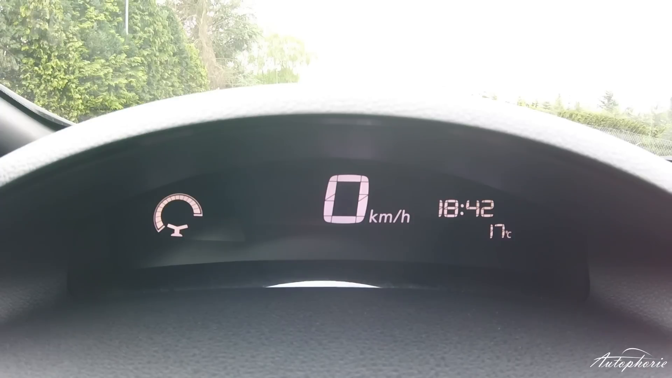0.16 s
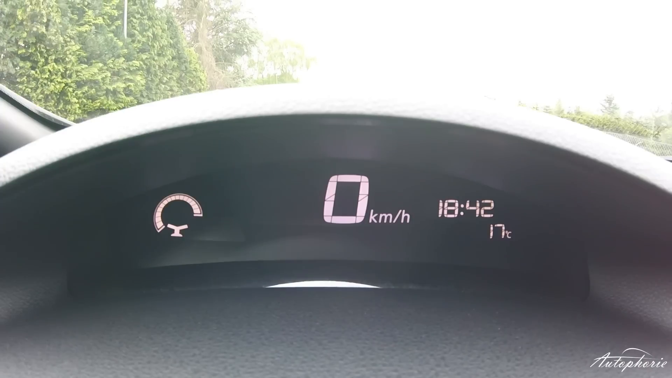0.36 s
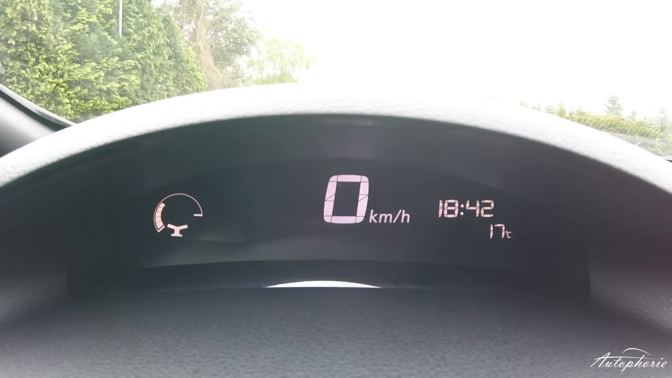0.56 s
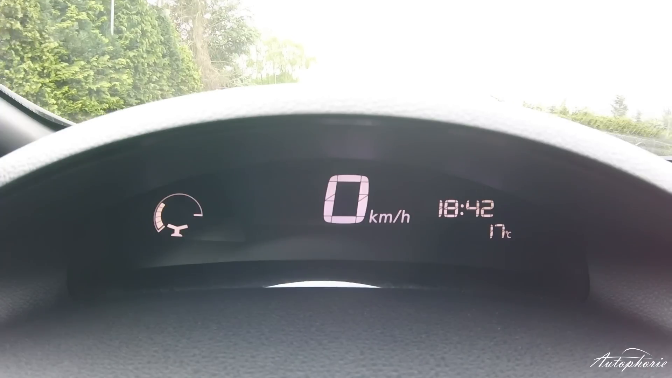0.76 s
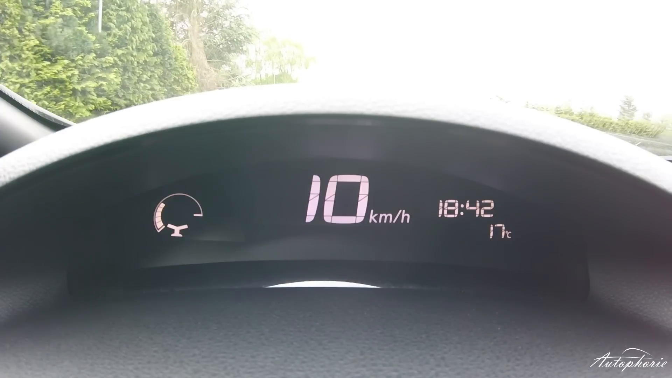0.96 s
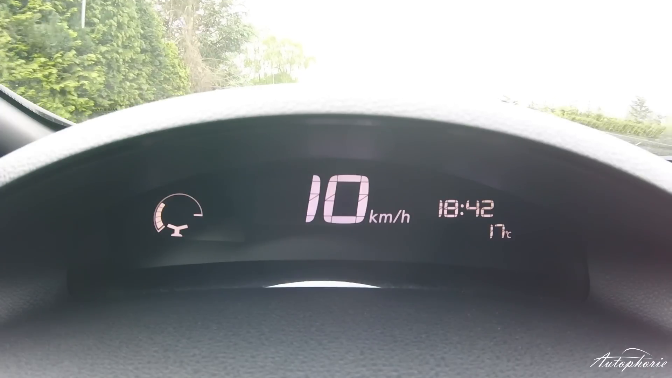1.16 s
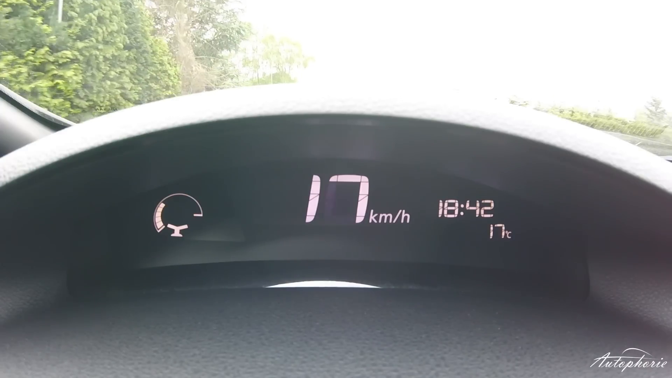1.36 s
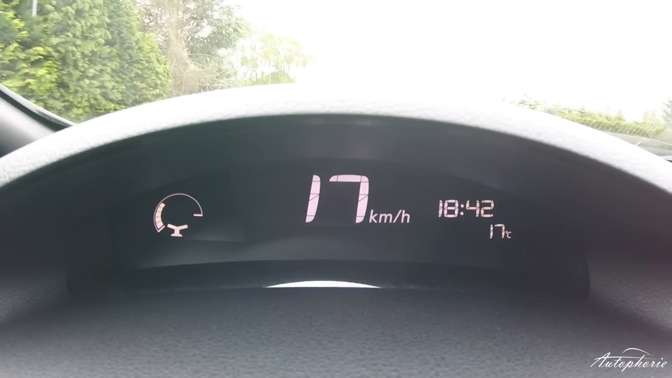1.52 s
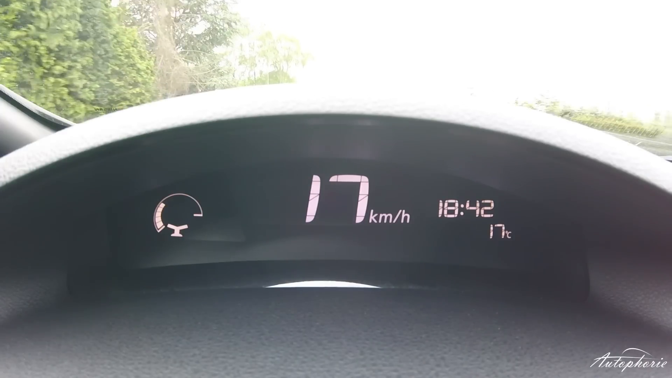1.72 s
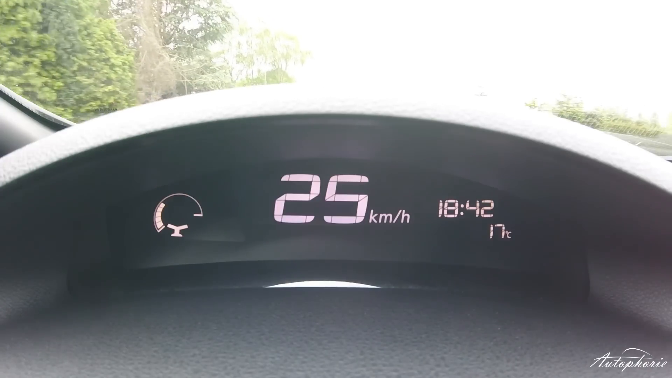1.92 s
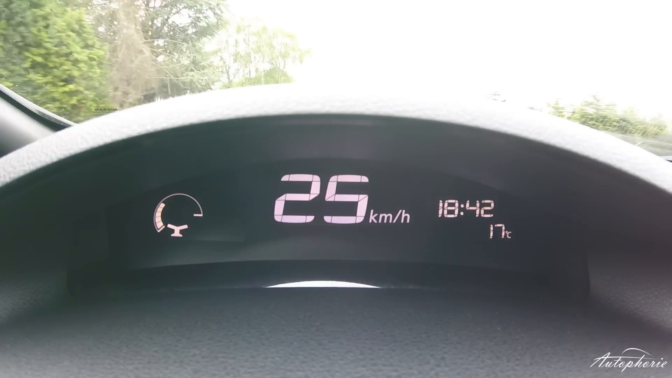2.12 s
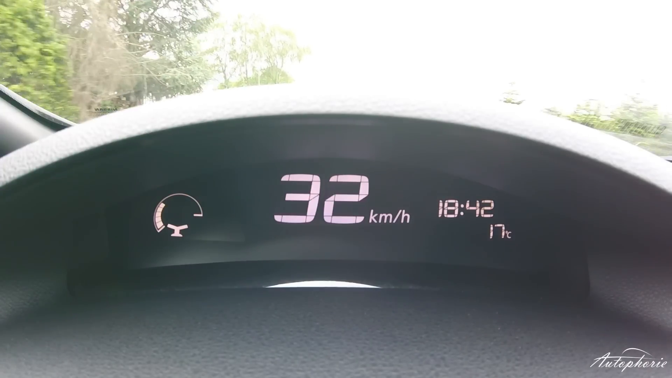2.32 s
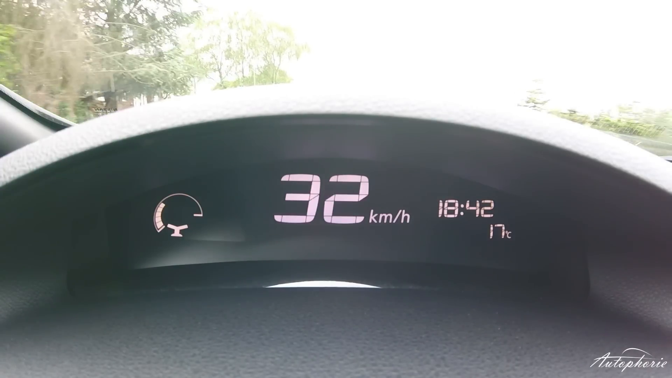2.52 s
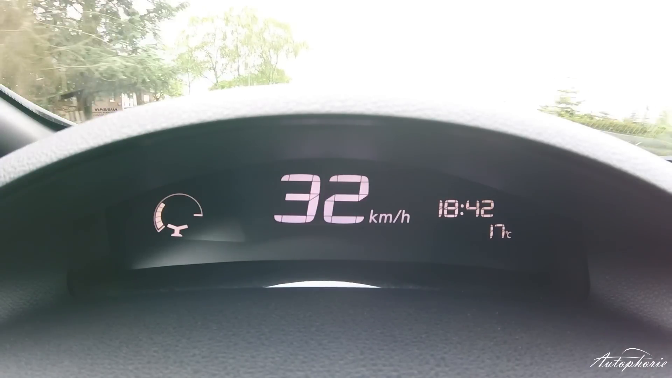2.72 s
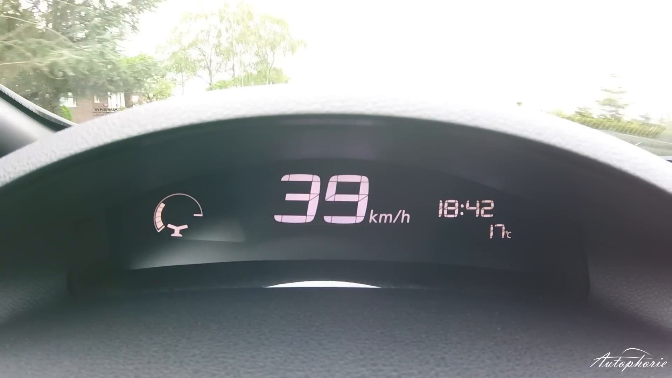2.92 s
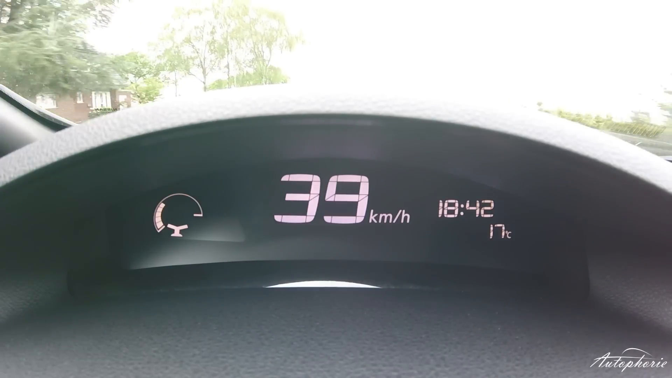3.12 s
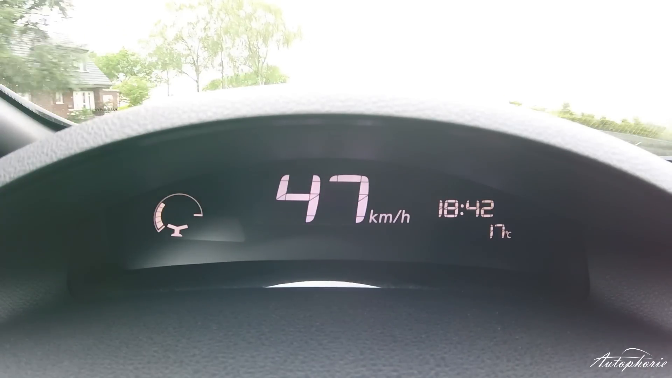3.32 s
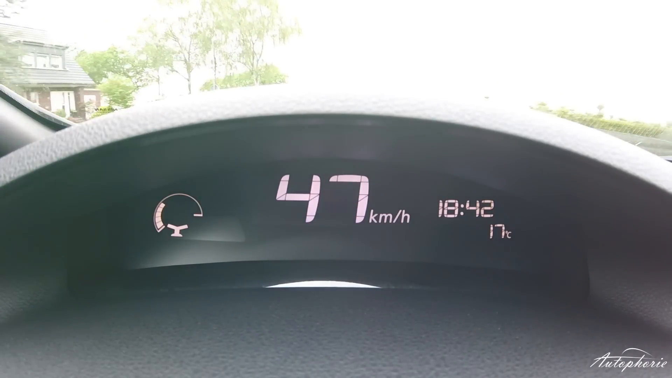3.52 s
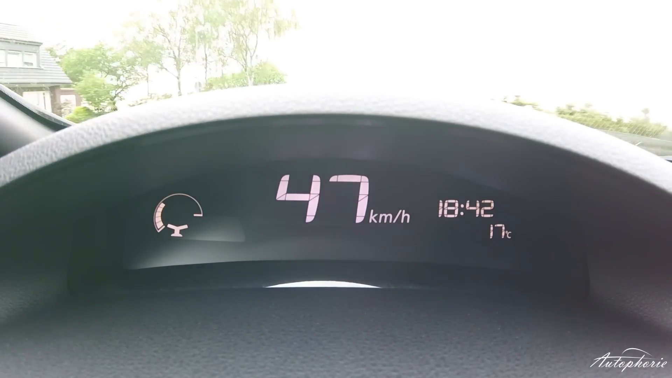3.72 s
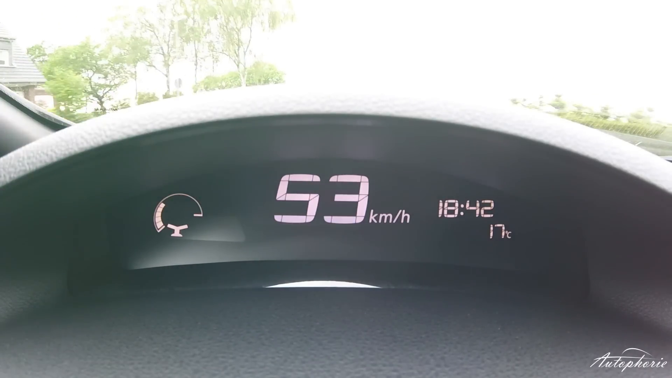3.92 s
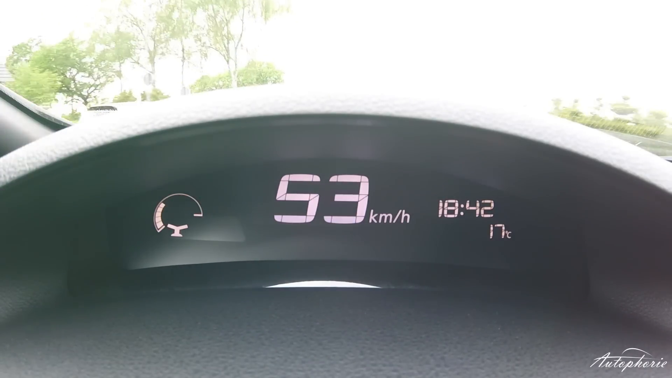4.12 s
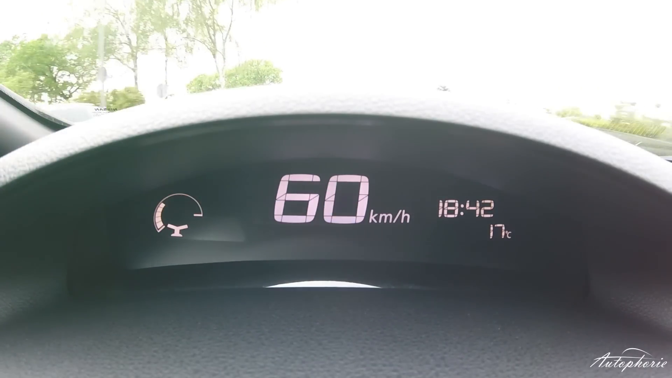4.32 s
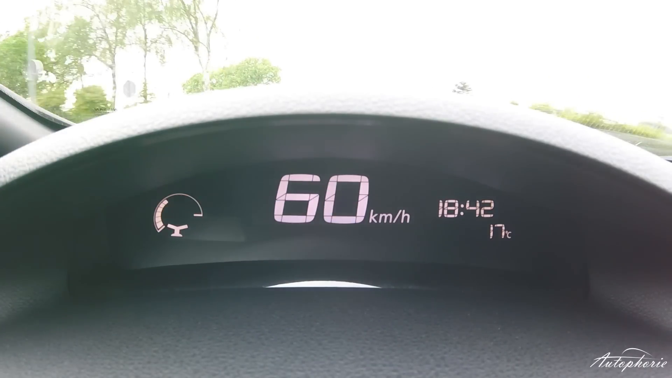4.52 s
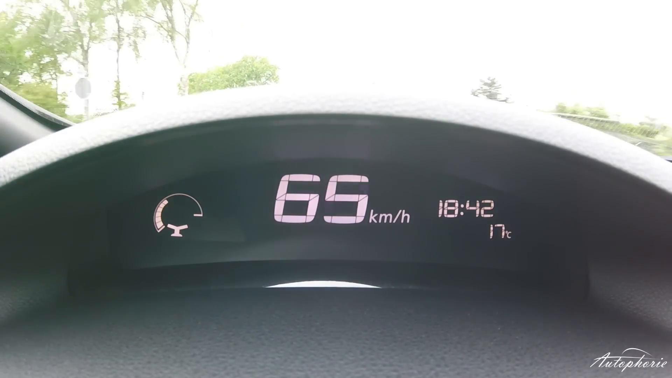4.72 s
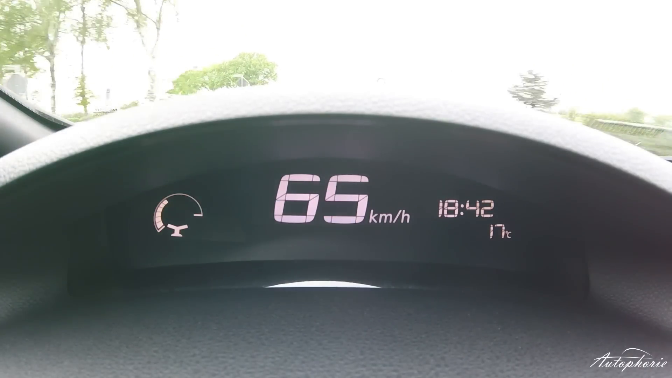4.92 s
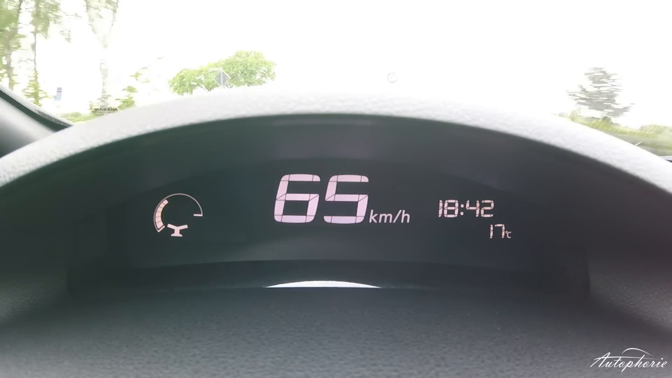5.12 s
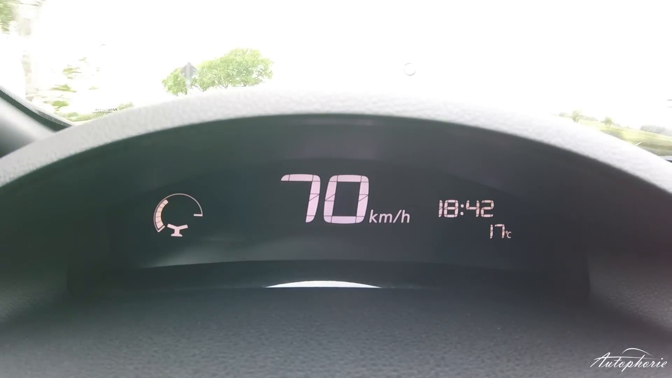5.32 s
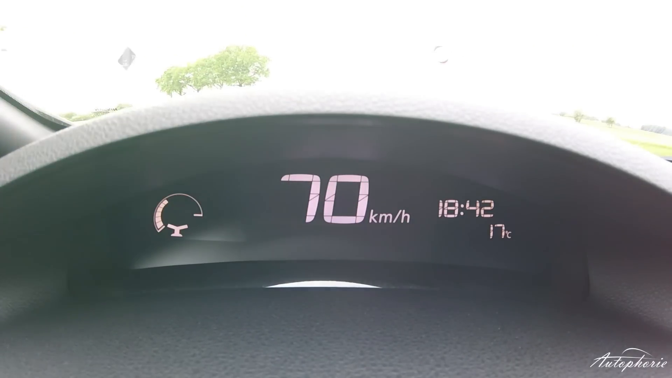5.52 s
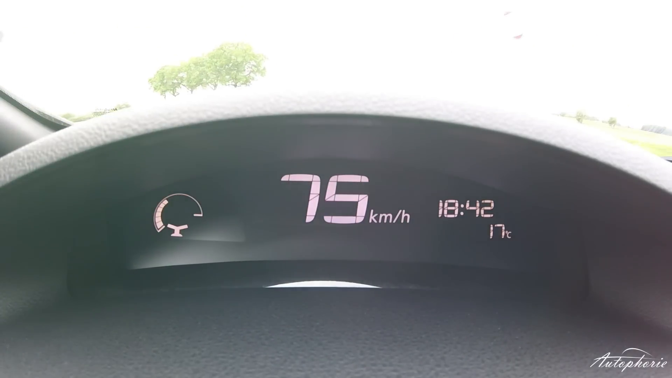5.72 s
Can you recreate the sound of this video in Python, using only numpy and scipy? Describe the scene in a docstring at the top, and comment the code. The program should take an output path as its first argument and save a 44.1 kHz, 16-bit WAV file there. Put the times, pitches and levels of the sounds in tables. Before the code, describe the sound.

Inside an electric car flooring it from standstill: a click and thump, then a rising motor whine over swelling road rumble and wind roar.

```python
"""Inside an electric car, microphone in the cabin, as it pulls away from rest at full power.
Motor and gear tones are multiples of the climbing shaft speed and swell as they cross the cabin's modes.
Shaped noise gives rumble, tread and wind roar that grow with speed; narrow noise gives the low boom.
Sharp clicks, a double thump, decaying trim resonances that creak and a few squeaks lie over a steady
hiss and a faint inverter whistle."""
import sys
import numpy as np
from scipy import signal
from scipy.fft import rfft, irfft
from scipy.io import wavfile
from scipy.ndimage import uniform_filter1d

SR = 44100
rng = np.random.default_rng(int(sys.argv[2]) if len(sys.argv) > 2 else 0)


def invert_db(level):
    """Linear amplitude ratio for a level in decibels (20 dB per decade), elementwise."""
    return 10 ** (np.asarray(level, dtype=float) / 20)


def file_out(sig):
    """Save sig as 16-bit WAV at sys.argv[1]."""
    # one column per channel
    cols = np.atleast_2d(sig).T
    # limit, then scale
    lim = np.clip(cols, -1, 1)
    pcm = np.round(lim * 32767).astype(np.int16)
    wavfile.write(sys.argv[1], SR, pcm)


N = 254016
T = np.arange(N) / SR
BASE_HZ = 96  # shaft speed at which full torque gives way to full power

# time and frequency grid of the noise spectra: frames of 2048 samples, 512 apart
FRAME_T = np.arange(N // 512 + 5) * 512 / SR
BIN_HZ = np.fft.rfftfreq(2048, 1 / SR)[:, None]

# level of the tyre tread band where it stands on its climb [f/Hz, level/dB]
TREAD_LEVEL = [(40, -70), (65, -37.5), (90, -32.5), (147, -31), (180, -35), (260, -31), (330, -43),
               (460, -39), (580, -42), (740, -61)]


def evened(x):
    """Scales a sound to rms 1."""
    return x / np.sqrt(np.mean(x ** 2) + 1e-20)


def read(points, hz):
    """Reads a (Hz, value) curve, straight between its points on a log frequency axis."""
    f, value = np.transpose(points)
    return np.interp(np.log(hz + 1), np.log(f + 1), value)


def add(mix, s, sound):
    """Lays a sound into the mix from s seconds on."""
    part = mix[round(s * SR):][:len(sound)]
    part += sound[:len(part)]


def smooth(x, width_hz):
    """One-pole low pass with its corner at half of width_hz."""
    r = np.exp(-np.pi * width_hz / SR)
    return signal.lfilter([1 - r], [1, -r], x)


def resonate(x, hz, width_hz):
    """A damped mode: shifts hz down to zero, smooths there and shifts back."""
    turn = np.exp(2j * np.pi * hz * np.arange(len(x)) / SR)
    return 2 * (turn * smooth(x / turn, width_hz)).real


def tone(hz, db, width_hz, steady):
    """A line on the curve hz, blurred by a wandering phase; steady 0 throbs like noise, 1 is the most even."""
    drift = evened(smooth(smooth(rng.standard_normal((2, N)), width_hz), width_hz))
    even = (np.sum(drift ** 2, axis=0) + 0.46) ** (-np.clip(steady, 0, 1) / 2)
    turn = 2 * np.pi * np.cumsum(hz) / SR
    wave = even * (drift[0] * np.cos(turn) + drift[1] * np.sin(turn))
    return invert_db(db) * evened(wave)


def whine(hz, wander_rad):
    """A steady sine on the curve hz, rms 1, whose phase wanders a little."""
    wander = evened(smooth(smooth(rng.standard_normal(N), 30), 30))
    return np.sqrt(2) * np.cos(2 * np.pi * np.cumsum(hz) / SR + wander_rad * wander)


def noise(spectrum):
    """Noise built from random complex spectra, frame by frame, under the given amplitudes."""
    real, imaginary = rng.standard_normal((2, len(BIN_HZ), len(FRAME_T)))
    unit = np.sqrt(3 / 8)  # overlap of four Hann frames: rms 1 for unit power
    z = (real + 1j * imaginary) * spectrum * unit
    return signal.istft(z, nperseg=2048, noverlap=1536)[1][:N]


def shaft(t):
    """Shaft speed in Hz: torque builds, holds up to base speed, then power holds and the climb flattens."""
    start_s, torque_rise_s, climb_hz_per_s = 0.035, 0.17, 32.35
    u = np.maximum(t - start_s, 0)
    hz = climb_hz_per_s * (u - torque_rise_s * (1 - np.exp(-u / torque_rise_s)))
    # the climb hesitates briefly as the drive shafts take up slack
    catch_s, catch_length_s, catch_hz = 0.405, 0.03, 0.7
    hz = np.maximum(hz - catch_hz * np.exp(-((t - catch_s) / catch_length_s) ** 2), 0)
    at_full_power = np.sqrt(abs(BASE_HZ * (2 * hz - BASE_HZ)))
    return np.where(hz > BASE_HZ, at_full_power, hz)


def with_speed(shaft_hz, db, db_per_octave, rest_hz):
    """Level law of a road sound: db near base speed, levelling off below rest_hz of shaft speed."""
    return db + db_per_octave * np.log2(np.hypot(shaft_hz, rest_hz) / BASE_HZ)


def lift(hz):
    """Gain that the resonant panels give to road noise."""
    # panels that colour the road noise [f/Hz, width/Hz, lift/dB]
    panel_modes = [(141.6, 4.9, 6.5), (225.7, 8.2, 10), (242.6, 4.3, 10), (261, 18, 9), (463, 20, 3.5),
                   (500, 21, 2), (551, 49, 4.5), (823, 8.5, 8), (932, 33, 3.5), (1640, 9.5, 4.5),
                   (2240, 14, 11), (4350, 120, 5.5)]
    return invert_db(sum(db / (1 + (2 * (hz - f) / w) ** 2) for f, w, db in panel_modes))


def road():
    """Shaped noise through the panels: rumble, a tread band that climbs with shaft speed, and roar."""
    # shape of the rumble, relative [f/Hz, level/dB per Hz]
    rumble_curve = [(56, -25.5), (95, -20), (108, -0.5), (172, -6), (194, -16), (236, -12), (296, -27),
                    (330, -25), (430, -45.5), (730, -120)]
    # shape of the tyre and wind roar before its tilt, relative [f/Hz, level/dB per Hz]
    roar_curve = [(160, -20), (280, -3), (392, -7.5), (752, -11.5), (797, -11.5), (864, -16), (948, -12),
                  (1460, -25.5), (1620, -22.5), (2550, -31.5), (4500, -36.5), (5850, -67), (9900, -120)]
    shaft_hz = shaft(FRAME_T)

    # the rumble climbs from its rest level around the knee speed, then holds
    rumble_db, rest_db, knee_hz = -28, -49, 27.5
    rumble_db = rumble_db + (rest_db - rumble_db) * np.exp(-(shaft_hz / knee_hz) ** 2)
    rumble = invert_db(read(rumble_curve, BIN_HZ))

    tread_order, tread_octaves = 4.705, 0.24  # centre in multiples of shaft speed, width
    tread_hz = tread_order * shaft_hz
    tread_db = read(TREAD_LEVEL, tread_hz)
    octaves = np.log2((BIN_HZ + 1) / (tread_hz + 1))
    tread = np.exp(-0.5 * (octaves / tread_octaves) ** 2) + 1e-9

    # a roar of movement in the cabin dies away at the start
    settle_db, settle_s = -47, 0.1
    settling = invert_db(settle_db) ** 2 * np.exp(-FRAME_T / settle_s)
    driving = invert_db(with_speed(shaft_hz, db=-39.5, db_per_octave=6.3, rest_hz=3.2)) ** 2
    roar_db = 10 * np.log10(driving + settling)
    # the roar brightens with speed
    tilt_db = -3 * (1.5 - shaft_hz / shaft_hz[-1])
    roar = invert_db(tilt_db * np.log2(BIN_HZ / 1000 + 0.098)) * invert_db(read(roar_curve, BIN_HZ))

    # small uneven patches in time and frequency, shared by all three layers
    patches = rng.standard_normal((len(BIN_HZ), len(FRAME_T)))
    patches = uniform_filter1d(patches, size=8, axis=0)
    patches = evened(uniform_filter1d(patches, size=5, axis=1))
    power = 0
    for shape, db in ((rumble, rumble_db), (tread, tread_db), (roar, roar_db)):
        # each level holds as heard after the panels
        after_panels = np.sum((lift(BIN_HZ) * shape) ** 2, axis=0)
        power = power + shape ** 2 / after_panels * invert_db(db + 0.59 * patches) ** 2
    tyres = noise(np.sqrt(power))
    return irfft(rfft(tyres) * lift(np.fft.rfftfreq(N, 1 / SR)), N)


def hiss():
    """Steady shaped noise with a sharp upper edge and a slight flicker in broad bands."""
    # shape of the hiss, relative [f/Hz, level/dB per Hz]
    hiss_curve = [(180, -31), (300, 0.5), (354, -6), (535, 0), (696, -10), (1460, -14), (1590, -12),
                  (3810, -20.5), (6790, -18.5), (12700, -32.5), (15500, -50)]
    hiss_db, top_hz, flicker_db = -56, 14500, 1.0
    shape = invert_db(read(hiss_curve, BIN_HZ)) / (1 + (BIN_HZ / top_hz) ** 200)
    flicker = rng.standard_normal((len(BIN_HZ), len(FRAME_T)))
    flicker = evened(uniform_filter1d(flicker, size=200, axis=0))
    return noise(shape / np.linalg.norm(shape) * invert_db(hiss_db + flicker_db * flicker))


def swells(bumps):
    """Level in dB of a mode that each bump swings up and lets die."""
    power = sum(invert_db(db) ** 2 * np.exp(-np.abs(2 * (T - s) / length) ** 1.76) for s, db, length in bumps)
    return 10 * np.log10(power + 1e-12)


def boom():
    """The road keeps the body heave and the cabin air mode swinging; larger bumps make them swell."""
    # larger bumps that swing the body heave [t/s, level/dB, length/s]
    heave_bumps = [(.23, -26.5, 0.086), (.81, -40, 0.036), (1.0, -33, 0.044), (1.63, -23, 0.14),
                   (2.27, -24, 0.12), (3.06, -38, 0.066), (3.34, -19.5, 0.13), (3.66, -24, 0.069),
                   (3.99, -22, 0.14), (4.21, -27, 0.082), (4.7, -18.5, 0.2), (5.13, -28.5, 0.055),
                   (5.65, -32, 0.11)]
    # larger bumps that swing the cabin air [t/s, level/dB, length/s]
    air_bumps = [(.7, -23, 0.26), (1.22, -27.5, 0.2), (1.92, -27.5, 0.16), (2.18, -22.5, 0.066),
                 (2.48, -20, 0.12), (2.72, -20.5, 0.32), (3.12, -18, 0.053), (3.4, -18, 0.045),
                 (3.59, -15, 0.11), (3.93, -25, 0.2), (4.36, -14.5, 0.13), (4.82, -19.5, 0.11),
                 (5.06, -18.5, 0.072), (5.32, -18.5, 0.11), (5.55, -24, 0.19)]
    shaft_hz, one = shaft(T), np.ones(N)
    heave_db = with_speed(shaft_hz, db=-28, db_per_octave=1.9, rest_hz=2.3)
    air_db = with_speed(shaft_hz, db=-25, db_per_octave=4.54, rest_hz=15)
    out = tone(31.6 * one, heave_db, width_hz=29.0, steady=0.25)
    out += tone(68.56 * one, air_db, width_hz=34.9, steady=0.52)
    out += tone(34.98 * one, swells(heave_bumps), width_hz=7.9, steady=1.0)
    out += tone(62.45 * one, swells(air_bumps), width_hz=5.4, steady=0.73)
    return out


def inverter_whistle():
    """The inverter's switching: a faint high whistle of constant pitch and level."""
    # steady whistle [f/Hz, level/dB]
    whistles = [(10002, -98)]
    return sum(invert_db(db) * whine(hz * np.ones(N), wander_rad=0.5) for hz, db in whistles)


def clicks():
    """Sharp clicks: the signal jumps suddenly and leaks back to zero."""
    # sudden jumps [t/s, step before smoothing/dB, direction, upper corner/Hz]
    jumps = [(0.0294, -27, -1, 29400), (4.73, -30, 1, 8700)]
    out = np.zeros(N)
    for s, db, sign, sharp_hz in jumps:
        step = np.exp(-np.arange(2000) / SR / 0.0043)  # leak time in s
        rounded = smooth(smooth(step, 2 * sharp_hz), 2 * sharp_hz)
        add(out, s, np.sign(sign) * invert_db(db) * rounded)
    return out


def drive_line():
    """Orders of the shaft speed, and the inverter side tone that sinks as the shaft speeds up."""
    # modes from motor to cabin air, heard as swells of every tone [f/Hz, level/dB]
    path_modes = [(205, -46), (240, -44), (275, -45), (310, -56), (450, -53), (500, -62), (545, -51),
                  (620, -57), (680, -63), (740, -64), (795, -60), (850, -67), (898, -58), (945, -57),
                  (1062, -64), (1168, -55), (1255, -62), (1310, -63), (1500, -78), (1650, -73), (1800, -69),
                  (1900, -76), (2010, -73), (2177, -72), (2350, -79), (2530, -79), (2720, -79), (2900, -79),
                  (3090, -80), (3230, -79), (3330, -80), (3460, -76), (3610, -73), (3760, -77), (4030, -72),
                  (4320, -71), (4500, -76), (4640, -80), (4760, -77), (4930, -76), (5200, -77), (5440, -77),
                  (5660, -76), (5870, -78)]
    # gear tones, in multiples of shaft speed
    gear_orders = (9, 13.5, 17, 18, 36, 44)
    # gear tones [level at base speed before the path/dB, change per octave above base speed/dB]
    gear_tones = [(-1, -10), (-2, -8), (-3, -7), (-6, -10), (-38, 44), (-22, 36)]
    # gear tones [gain per octave of speed up to base speed/dB]
    gear_rises = (7, 9, 22, 22, 6, 6)
    shaft_hz, grid = shaft(T), np.arange(1, 9000.)
    below_base = np.log2(np.clip(shaft_hz / BASE_HZ, 1e-3, 1))  # octaves, negative
    above_base = np.log2(np.maximum(shaft_hz / BASE_HZ, 1))  # octaves

    path = 0
    for f, db in path_modes:
        width_hz = 25 + 0.012 * f  # losses widen the higher modes
        path = path + invert_db(db) ** 2 / (1 + (2 * (grid - f) / width_hz) ** 2) ** 1.6
    path_db = 10 * np.log10(path)

    def heard_db(hz, db, fade_db):
        return db + fade_db * above_base + np.interp(hz, grid, path_db)

    def clean(hz, db, fade_db):
        return invert_db(heard_db(hz, db, fade_db)) * whine(hz, wander_rad=0.6)

    # motor slots: 0.5 dB stronger per octave slower, throbbing once per shaft turn
    out = clean(48 * shaft_hz, db=0, fade_db=-4) * invert_db(-0.5 * below_base)
    out *= 1 + 0.2 * np.cos(2 * np.pi * np.cumsum(shaft_hz) / SR)
    # motor field
    out += clean(12 * shaft_hz, db=1, fade_db=-36)
    for order, (db, fade_db), rise_db in zip(gear_orders, gear_tones, gear_rises):
        hz = order * shaft_hz
        out += tone(hz, heard_db(hz, db + rise_db * below_base, fade_db), width_hz=9, steady=0.9)

    # side tone below the carrier, coming in over a tenth of an octave past base speed
    carrier_hz, side_order = 5000, 6
    side_hz = carrier_hz - side_order * shaft_hz
    side = tone(side_hz, heard_db(side_hz, db=-5, fade_db=-14), width_hz=20, steady=0.6)
    side = side * np.minimum(above_base / 0.1, 1)

    start_s, torque_rise_s = 0.035, 0.17  # as in shaft()
    torque = 1 - np.exp(-np.maximum(T - start_s, 0) / torque_rise_s)
    return torque ** 3 * out + side


def growl():
    """The tread blocks strike almost evenly: a fuzzy tone inside the tread band."""
    hz = 4.7 * shaft(T)
    under_band_db = -12
    return tone(hz, read(TREAD_LEVEL, hz) + under_band_db, width_hz=40, steady=0.4)


def thump():
    """The pedal hits its stop and bounces: the floor pan rings briefly."""
    # strikes [t/s, gain on the ring/dB]
    strikes = [(0.07, -33), (0.085, -25.5)]
    # floor pan modes [f/Hz, relative level/dB, time to fall 60 dB/s]
    pan_modes = [(76, 13, 0.096), (128.5, -2, 0.2), (215.6, -23, 0.042)]
    out, t = np.zeros(N), np.arange(SR // 4) / SR
    ring = sum(invert_db(db - 60 * t / t60) * np.sin(2 * np.pi * hz * t) for hz, db, t60 in pan_modes)
    onset = np.minimum(t / 0.0035, 1)
    for s, db in strikes:
        add(out, s, invert_db(db) * ring * onset)
    return out


def creaks():
    """Plastic slips as the body takes up load: uneven ticks crackle and knock trim modes; squeaks ring."""
    # slips [t/s, crackle level/dB, knock level/dB, crackle centre f/Hz, length/s]
    slip_events = [(0.075, -97, -59.5, 2500, 0.035), (0.191, -74.5, -54.5, 2980, 0.024),
                   (0.212, -75.5, -59, 3300, 0.02), (0.252, -100, -67, 2700, 0.012),
                   (0.527, -86, -85, 4000, 0.025), (0.687, -71, -74, 3650, 0.095),
                   (0.713, -77, -67, 2800, 0.046), (0.73, -82, -67.5, 2500, 0.014),
                   (1.154, -100.5, -97, 4070, 0.01), (1.21, -86, -93, 4500, 0.01),
                   (1.267, -76, -88, 4450, 0.022)]
    # trim modes that the slips knock [f/Hz, width/Hz, relative level/dB]
    trim_modes = [(270, 175, 18), (476, 220, 13), (946, 170, 9), (1270, 300, -12), (1650, 400, -1.5),
                  (2330, 230, -6.5)]
    # thin plastic modes that colour the crackle [f/Hz, width/Hz]
    shell_modes = [(1800, 400), (3050, 540), (4450, 370), (5700, 840)]
    # squeaks [t/s, length/s, f/Hz, width/Hz, level before the fades/dB]
    squeak_events = [(0.323, 0.062, 1950, 160, -62), (0.921, .36, 2220, 40, -75)]
    shell_share = 0.21
    out, t = np.zeros(N), np.arange(SR // 8) / SR
    for s, crackle_db, knock_db, hz, length in slip_events:
        clump = (t / length) ** 0.27 * np.exp(-2 * (t / length) ** 2)
        slips = rng.standard_normal(len(t)) * rng.exponential(1, len(t)) ** 1.7 * clump
        crackle = slips
        for _ in range(3):
            crackle = resonate(crackle, hz, 3200)
        crackle = evened(crackle)
        shell = sum(resonate(resonate(crackle, f, w), f, w) for f, w in shell_modes)
        crackle = evened(crackle + shell_share * evened(shell))
        knock = sum(invert_db(db) * resonate(resonate(slips, f, w), f, w) / np.sqrt(w) for f, w, db in trim_modes)
        creak = invert_db(crackle_db) * crackle + invert_db(knock_db) * evened(knock)
        add(out, s, creak * np.sqrt(t[-1] / length))  # levels refer to the length of the slip
    for s, length, hz, width_hz, db in squeak_events:
        count = round(length * SR)
        squeak = resonate(rng.standard_normal(SR // 2), hz, width_hz)[-count:]
        add(out, s, invert_db(db) * evened(squeak) * np.hanning(count))
    return out


def scene():
    """All the sounds in the cabin, summed to one channel."""
    ambience = road() + hiss() + boom() + inverter_whistle()
    drive = clicks() + drive_line() + growl()
    return (ambience + drive + thump() + creaks())[None]


def top_cut(x):
    """Nothing passes above the cut-off."""
    return signal.sosfilt(signal.butter(12, 16350, fs=SR, output="sos"), x)


def record(dry):
    """Microphone low cut, a quick fade at the end, then a preamp that saturates softly."""
    low_cut_hz, fade_out_s = 14.2, 0.0039
    ceiling = 0.93  # amplitude that the preamp approaches
    cut = signal.lfilter(*signal.butter(2, low_cut_hz, "high", fs=SR), dry)
    faded = cut * np.clip((T[-1] - T) / fade_out_s, 0, 1)
    mix = ceiling * np.tanh(faded / ceiling)
    return top_cut(mix)


dry = scene()
out = record(dry)
file_out(out)
```